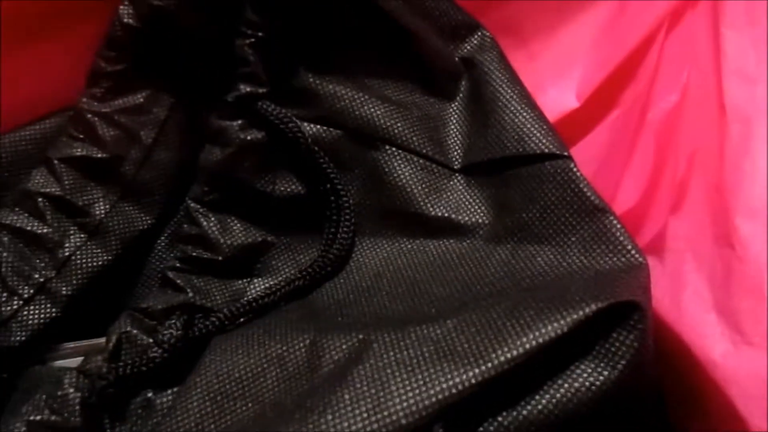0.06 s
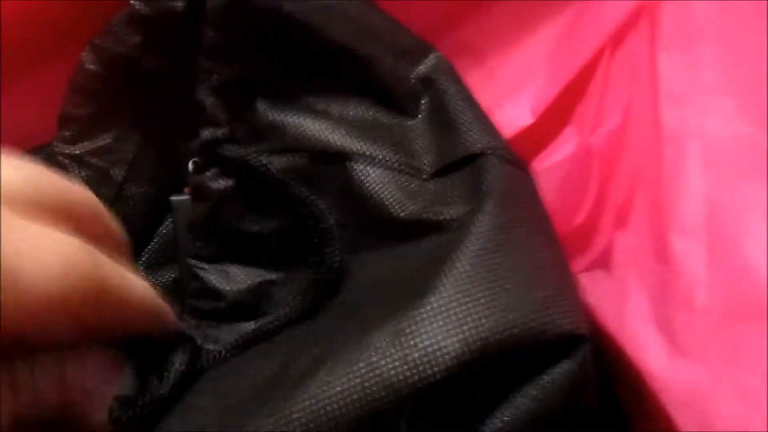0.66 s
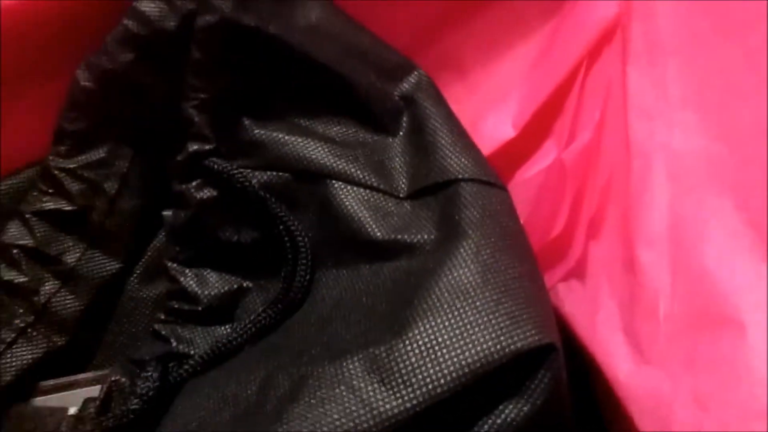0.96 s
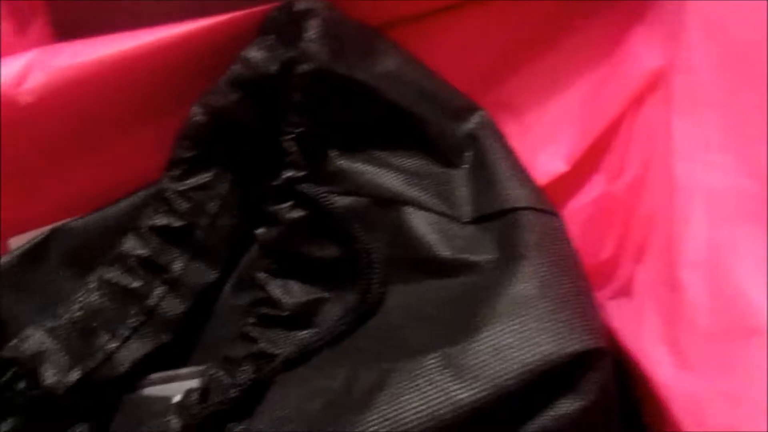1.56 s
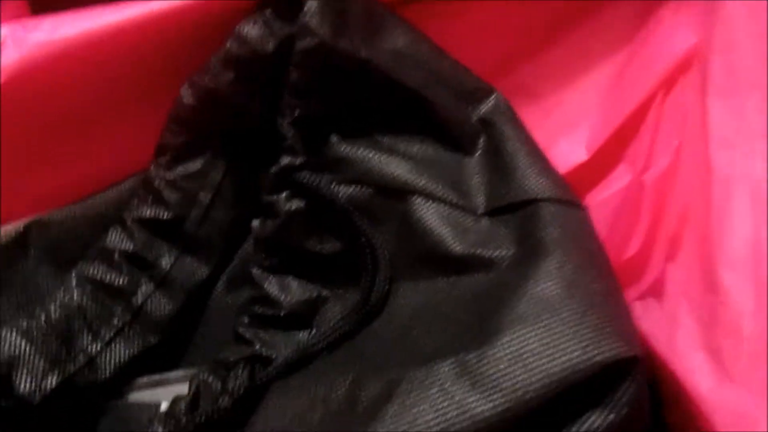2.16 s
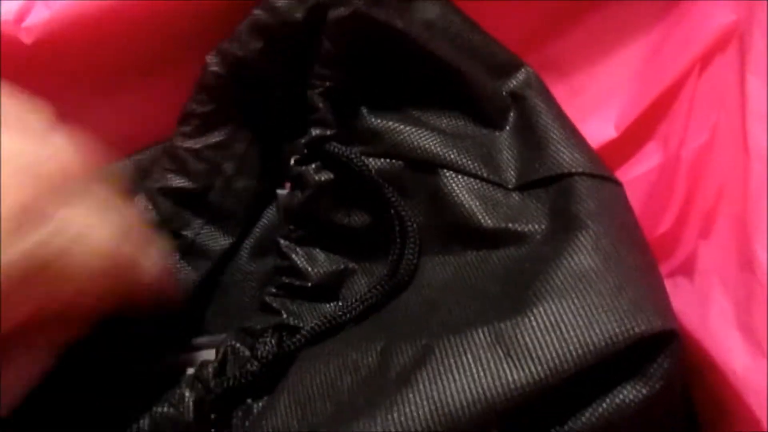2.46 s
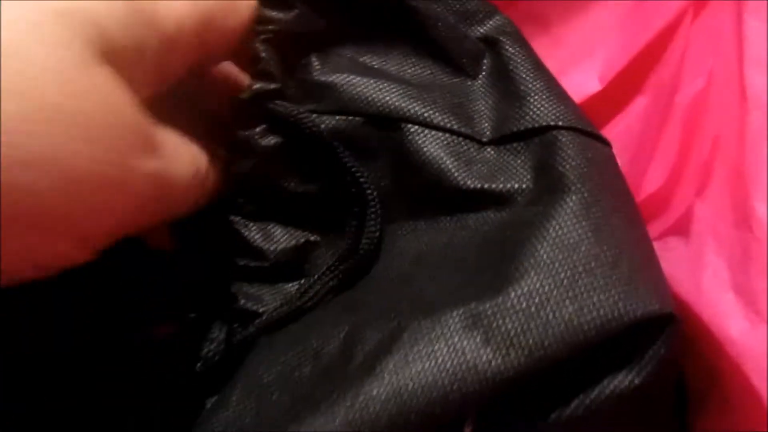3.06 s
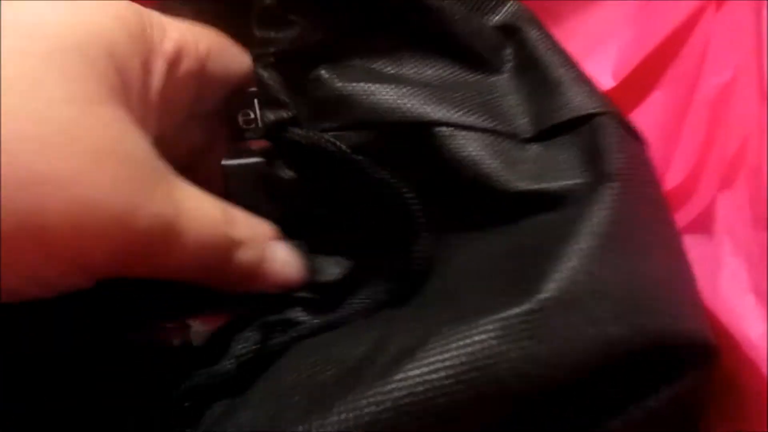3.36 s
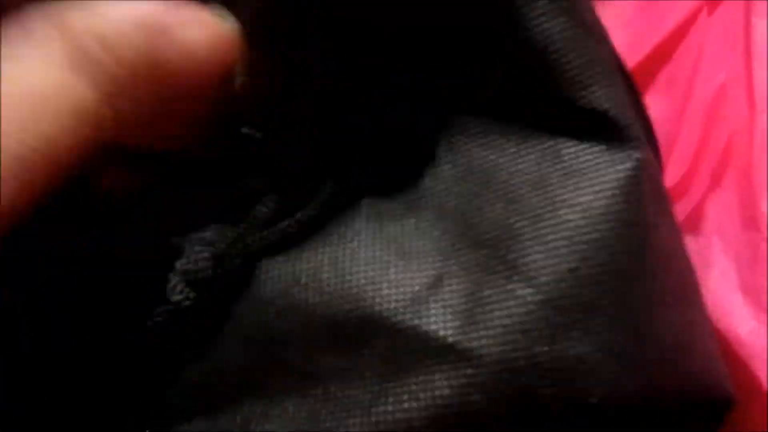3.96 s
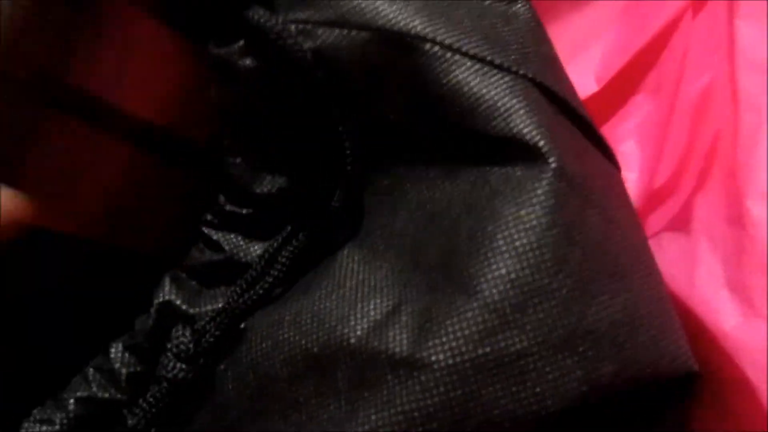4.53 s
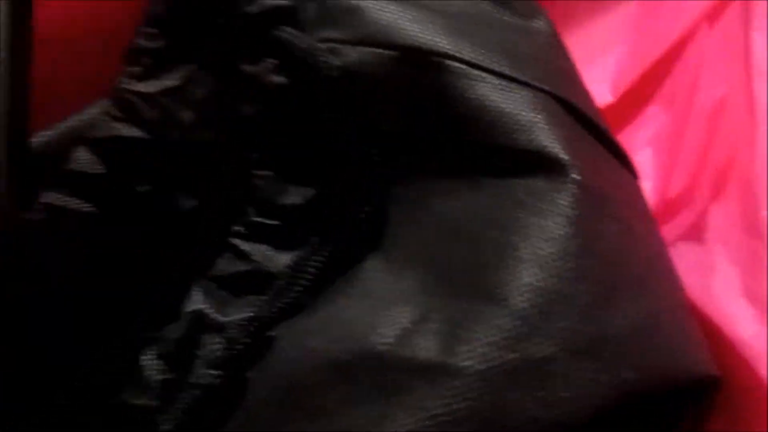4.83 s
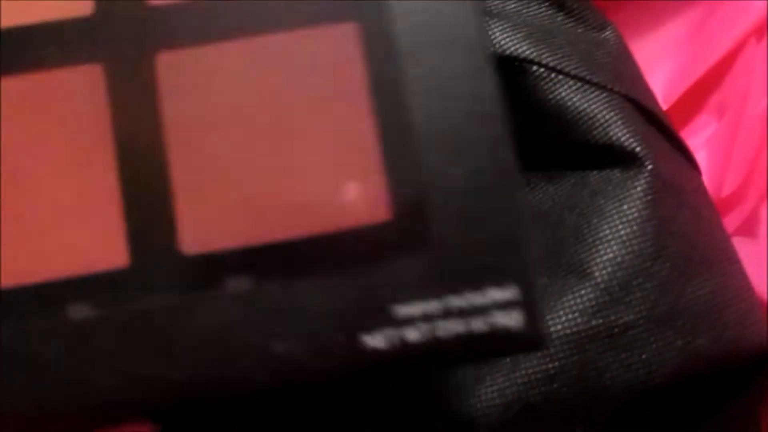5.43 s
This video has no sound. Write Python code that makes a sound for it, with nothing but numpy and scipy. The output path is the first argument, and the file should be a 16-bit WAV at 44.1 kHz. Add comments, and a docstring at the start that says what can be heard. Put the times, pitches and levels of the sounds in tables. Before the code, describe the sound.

A hand rummages in a stiff synthetic drawstring bag, close to the microphone in a small room with little echo. A low fan hum and a faint, fluttering, very high whine run throughout. Soft bumps open the sound, and the cloth scrapes and crackles from about 0.4 to 0.9 seconds. A plastic case knocks lightly twice around 1 second. After a brief lull, a case drops at 1.8 seconds with a thud and a short hollow rattle, the loudest moment. From about 2.3 to 4.7 seconds the rummaging is nearly continuous: hissing, scraping fabric with sharp crease snaps, muffled bumps around 3.5 seconds and a small plastic knock at 3.8. The rustling then fades to a couple of faint crinkles just after 5 seconds. At about 5.6 seconds a plastic lid gives a quick, bright, dry click in the fingers.

```python
"""Rummaging in a drawstring bag

Up close, a hand digs through stiff synthetic fabric: the cloth scrapes and its creases snap.
A plastic case drops with a thud and a rattle; another is pulled out and clicks in the fingers.
Under it all, in a small room, a fan hums and a thin high whine, like a picture tube's, flutters."""
import sys
import numpy as np
from scipy import signal
from scipy.fft import rfft, irfft, next_fast_len
from scipy.io import wavfile
from scipy.ndimage import map_coordinates

SR = 44100
rng = np.random.default_rng(int(sys.argv[2]) if len(sys.argv) > 2 else 0)


def waveform_to_disk(signal):
    """Save audio, clipped to [-1, 1], as 16-bit WAV at the path in sys.argv[1]."""
    frames = np.transpose(np.atleast_2d(signal))
    scaled = np.clip(frames, -1, 1) * 32767
    samples = np.round(scaled).astype(np.int16)
    wavfile.write(sys.argv[1], SR, samples)


N = 246783
T = np.arange(N) / SR

# Tone colour of the fan's draught: f/Hz, level/dB
DRAUGHT_EQ = [(110, -54), (190, 1.5), (314, -4.5), (459, -9.5), (580, -14.5), (719, -19), (877, -11.5),
              (1210, -16.5), (1590, -15), (1770, -15.5), (2280, -15.5), (3700, -21.5), (4840, -23),
              (5490, -21.5), (14000, -24.5)]
# Swells and dips of the whine: t/s, level/dB
WHINE_LEVELS = [(0.03, -75), (0.78, -50), (0.92, -61), (1.2, -48), (1.24, -61), (1.49, -53.5), (2.24, -56),
                (2.3, -50.5), (4.89, -55), (5.09, -64), (5.44, -49), (5.55, -57)]
# Soft bumps through the bedding and the camera body: t/s, peak/dB, f/Hz, t60/s
SOFT_BUMPS = [(0.161, -25, 43, 0.12), (0.296, -30, 48, 0.085), (0.456, -26, 71.6, 0.059),
              (0.462, -31, 650, 0.0076), (0.688, -29.5, 86, 0.057), (0.690, -33.5, 328, 0.041),
              (1.406, -32, 50, .06), (1.7931, -10.5, 190, 0.024), (1.7996, -10, 96.6, 0.14),
              (2.985, -25.5, 150, 0.016), (3.402, -18, 86, 0.08), (3.552, -26, 79, 0.16),
              (3.560, -34.5, 505, 0.058), (3.585, -20.5, 106, 0.071), (4.148, -32, 244, 0.076),
              (4.157, -22.5, 87, 0.14), (4.445, -28, 107, 0.2), (4.592, -35, 580, 0.021),
              (5.036, -32.5, 60, 0.055)]
# Strokes of the hand: t/s, length/s, scrape/dB, hiss over scrape/dB, drag over scrape/dB
HAND_STROKES = [(0.247, 0.63, -55, -9, -1.5), (0.428, 0.43, -46, -1, 1), (0.963, 0.15, -45.5, -5, 1.5),
                (1.059, 0.13, -47, -4, 1.5), (1.1, 0.26, -54, -6, -5), (1.774, 0.15, -41, 0.5, .5),
                (1.897, 0.14, -42, -1, 1.5), (2.34, 0.039, -44.5, 7.5, 3.5), (2.433, 0.14, -43, 2.5, 2.5),
                (2.487, 0.28, -45.5, -0.5, 0), (2.729, 0.2, -48, -1, 2.5), (2.884, 0.34, -46.5, -1.5, 2.5),
                (2.983, 0.027, -46, 8.5, 0), (3.102, 0.2, -44, 1, 1.5), (3.293, 0.23, -45, -1.5, -1.5),
                (3.464, 0.27, -43, -1.5, 3), (3.646, 0.29, -46.5, 1, 2.5), (3.822, 0.049, -36, -9, 2.5),
                (3.86, 0.42, -49.5, -5.5, 2), (4.03, 0.39, -48.5, 6.5, 1.5), (4.125, 0.049, -41, 2, -1),
                (4.262, 0.19, -48.5, 1, 1), (4.386, .17, -44.5, 3, -1.5), (4.538, 0.16, -51, 4.5, -0.5),
                (4.64, 0.29, -63, -5, -1), (4.845, 0.32, -58, -1.5, -2.5)]
# Tone colour of the rubbed cloth: f/Hz, level/dB
CLOTH_EQ = [(88, -39), (150, -2.5), (233, 0), (356, -1.5), (587, -7.5), (829, -18), (1270, -11), (1930, -9),
            (3000, -16.5), (3710, -14), (4860, -18), (5350, -20.5), (6360, -18), (8810, -17.5),
            (14800, -27)]
# The loudest creases snapping over: t/s, peak/dB, treble over mids/dB, patch f/Hz
LOUD_CREASES = [(0.4557, -24, -10, 2200), (0.4725, -33, -2, 1440), (0.6147, -24.5, -7, 2050),
                (0.6612, -31, 6, 1560), (0.7411, -22, 4, 2710), (1.3697, -36.5, 2, 1870),
                (1.9252, -24.5, -2, 2180), (2.3493, -24, -2, 2220), (2.4954, -21, 3, 2030),
                (2.6797, -29.5, 3, 2220), (2.7204, -25, 4, 1360), (2.7688, -26.5, 4, 1800),
                (2.9197, -27, 11, 1830), (2.9472, -28, 5, 1310), (2.993, -21.5, 2, 4150),
                (2.9995, -24, 2, 1430), (3.0337, -21.5, -3, 3630), (3.0707, -23, -4, 1420),
                (3.2074, -20.5, 8, 2380), (3.336, -23, 8, 1330), (3.363, -25, 8, 1420),
                (3.4907, -28.5, 6, 1890), (3.5405, -22, 0, 1860), (3.7377, -23.5, 14, 1180),
                (3.7584, -22.5, 3, 2880), (3.9693, -30.5, 5, 1950), (4.0013, -24.5, -2, 2100),
                (4.1452, -28, 2, 1840), (4.1522, -28, 12, 1870), (4.2952, -28.5, -10, 2000),
                (4.3905, -28, -10, 2100), (4.4801, -26, 7.5, 1750), (4.6501, -25, 16, 2640),
                (4.667, -30.5, 5, 2700), (5.0711, -32, 15, 2580), (5.2263, -37, 5, 1990)]
# Plastic cases knocking together: t/s, peak/dB, treble edge over shell/dB, thump peak/dB
CASE_KNOCKS = [(1.0207, -22, -4.5, -33), (1.0941, -27, -13, -50), (1.8075, -15.5, -20, -23),
               (1.815, -14.5, -9.5, -36), (1.8203, -22, -1, -35), (1.942, -25, 1, -25.5),
               (3.83, -35, 1, -31), (3.8436, -30, -12, -26)]
# Ringing modes of a case: f/Hz, level/dB, t60/s
CASE_MODES = [(1275, 14, 0.032), (1400, -2, 0.039), (1956, -1, 0.27), (2230, 10.5, 0.036),
              (2859, -27, 0.12), (3530, -12, 0.065), (3740, 5, 0.09), (4230, -27, 0.25), (4370, 2, 0.05)]
# Clicks of the lid in the fingers: t/s, peak/dB
LID_CLICKS = [(5.5645, -37), (5.567, -26), (5.569, -12.5), (5.5772, -15)]
# Decay of the room: f/Hz, t60/s
ROOM_DECAY = [(150, 0.55), (1500, 0.42), (10000, 0.2)]


def amp(db):
    """Decibels to gain."""
    return 10 ** (np.asarray(db) / 20)


def unit(x):
    """Scale to rms 1."""
    return x / np.sqrt(np.mean(x ** 2) + 1e-20)


def along(points, hz):
    """Read (f/Hz, value) points on a log frequency axis."""
    freqs, values = np.transpose(points)
    return np.interp(np.log(hz + 1), np.log(freqs + 1), values)


def wobble(per_s):
    """A smooth random curve with per_s knots a second."""
    return map_coordinates(rng.standard_normal(int(N * per_s / SR) + 4), [T * per_s])


def equalise(x, gain_at):
    """Zero-phase EQ by a gain that is a function of frequency."""
    size = next_fast_len(len(x) + 8192)
    return irfft(rfft(x, size) * gain_at(np.fft.rfftfreq(size, 1 / SR)), size)[:len(x)]


def band(x, lo_hz, hi_hz, order=2):
    """Causal band-pass."""
    sos = signal.butter(order, [lo_hz, min(hi_hz, SR / 2 - 100)], "band", fs=SR, output="sos")
    return signal.sosfilt(sos, x)


def place(track, start, sound, peak_db):
    """Mix a sound into the track at start seconds, peaking at peak_db."""
    part = track[round(start * SR):][:len(sound)]
    part += amp(peak_db) * sound[:len(part)] / np.abs(sound).max()


def burst(t, t60):
    """Noise that dies away."""
    return rng.standard_normal(len(t)) * amp(-60 * t / t60)


def fan(hum_hz=120.05, slip_hz=2.063, crest_s=0.32):
    """The motor hums at twice the mains rate and beats with its lagging rotor, over moving air."""
    mains, rotor = np.cos(2 * np.pi * np.outer([hum_hz, hum_hz - slip_hz], T - crest_s))
    hum = amp(-0.3 * wobble(3.7)) * (amp(-38) * mains + amp(-48.5) * rotor)
    air = equalise(rng.standard_normal(N), lambda hz: amp(along(DRAUGHT_EQ, hz)))
    draught = amp(-55) * unit(band(air, 118, 11400, order=3))
    rumble = amp(-53) * unit(band(rng.standard_normal(N), 7.7, 137))
    return hum + draught + rumble


def whine(tones_hz=(15733.5, 15748.1), flutter_db=3):
    """Two close high tones wander in phase and beat, while their level flutters."""
    strong, weak = (np.sin(2 * np.pi * hz * T + wobble(3.88)) for hz in tones_hz)
    level_db = np.interp(T, *np.transpose(WHINE_LEVELS))
    return amp(level_db + flutter_db * wobble(60)) * unit(strong + 0.5 * weak)


def bumps(thump_hz=281.5, thump_t60=0.04):
    """Padded blows, and the hollow thump under each knock: a few damped cycles and a dull puff."""
    track, t = np.zeros(N), np.arange(SR // 3) / SR
    thumps = [(start, db, thump_hz, thump_t60) for start, _, _, db in CASE_KNOCKS]
    for start, db, hz, t60 in list(SOFT_BUMPS) + thumps:
        attack = 1 - np.exp(-t / 0.0007)
        swing = np.sin(2 * np.pi * hz * t) * amp(-60 * t / t60) * attack
        puff = band(burst(t, t60), hz, 3 * hz)
        place(track, start, unit(swing) + 0.2 * unit(puff), db)
    return track


def hand_strokes(skew=0.75, speed_exponent=0.9):
    """Gains of scrape, hiss and drag: the hand speeds up early in each stroke, then slows to rest."""
    power = np.zeros((3, N))  # overlapping strokes add in power
    for start, length, db, hiss_db, drag_db in HAND_STROKES:
        during = slice(*np.searchsorted(T, [start, start + length]))
        progress = (T[during] - start) / length
        speed = np.abs(np.sin(np.pi * progress ** skew))
        gains = amp([db, db + hiss_db, db + drag_db])
        power[:, during] += np.outer(gains, speed ** speed_exponent) ** 2
    return np.sqrt(power)


def fibre_slips(per_s, spread_db):
    """Fibres catch and let go: random impulses of uneven size."""
    size = amp(spread_db * np.minimum(rng.exponential(size=N), 4))
    return unit((rng.random(N) < per_s / SR) * size * rng.choice([-1, 1], N))


def wrinkles(per_s, pitch_hz, cycles, spread_db):
    """Small wrinkles pop in clusters, each ringing out briefly at a pitch of its own."""
    t = np.arange(SR // 100) / SR
    starts = np.flatnonzero(rng.random(N) < per_s / SR * amp(4 * wobble(25)))
    detune, size = rng.standard_normal((len(starts), 2)).T[:, :, None]
    hz = np.clip(pitch_hz * np.exp(0.4 * detune), 600, 13000)
    pops = amp(spread_db * np.minimum(size, 2) - 60 * t * hz / cycles) * np.sin(2 * np.pi * hz * t)
    positions = starts[:, None] + np.arange(len(t))
    return unit(np.bincount(positions.ravel(), pops.ravel(), N)[:N])


def rustle(scrape_gain, hiss_gain, drag_gain):
    """Cloth slides on cloth: a crinkly scrape and a hiss of weave, over the bag's hollow drag."""
    friction = unit(rng.standard_normal(N) + 0.81 * fibre_slips(per_s=1000, spread_db=4))
    friction *= amp(2.08 * wobble(70))  # the fingers stick and slide
    cloth = equalise(friction, lambda hz: amp(along(CLOTH_EQ, hz)))
    crinkle = wrinkles(per_s=300, pitch_hz=2100, cycles=16.5, spread_db=7)
    fine_crinkle = wrinkles(per_s=260, pitch_hz=7640, cycles=7.8, spread_db=0.5)
    swish = amp(0.71 * wobble(28))  # the weave catches in short swishes
    scrape = scrape_gain * unit(unit(band(cloth, 710, 4750, order=3)) + 0.5 * crinkle)
    weave = unit(band(cloth, 5210, 19600, order=5))
    hiss = hiss_gain * unit(swish * (weave + 0.62 * fine_crinkle))
    drag = drag_gain * unit(band(cloth, 142, 814, order=3))
    heave = amp(-2) * drag_gain * unit(band(rng.standard_normal(N), 56, 143))  # the whole bag shifts
    return scrape + hiss + drag + heave


def creases(folds):
    """A fold buckles with a sharp snap and a short crackle; its patch of cloth rings briefly."""
    track, t = np.zeros(N), np.arange(SR // 20) / SR
    for start, db, treble_db, patch_hz in folds:
        crack = burst(t, t60=0.0059) + 0.046 * burst(t, t60=0.022) + 2 * (t == 0)
        patch = np.sin(2 * np.pi * patch_hz * t) * amp(-60 * t / 0.011)
        mids = unit(band(crack, 1340, 4940, order=3)) + unit(patch)
        treble = amp(treble_db) * unit(band(crack, 5100, 12700))
        place(track, start, mids + treble, db)
    return track


def small_creases(scrape_gain, per_s=9.8, over_scrape_db=12, treble_db=5, patch_hz=2000):
    """Lesser folds give way at random, as hard as the hand is rubbing."""
    folds = []
    for i in np.flatnonzero(rng.random(N) < per_s / SR):
        size, brightness, detune = rng.standard_normal(3)
        peak_db = 20 * np.log10(scrape_gain[i] + 1e-9) + over_scrape_db + 2 * size
        folds.append((T[i], peak_db, treble_db + 5 * brightness, patch_hz * np.exp(0.28 * detune)))
    return creases(folds)


def case_knocks():
    """Every contact cracks and rings the hollow plastic case, with a new balance of its modes."""
    track, t = np.zeros(N), np.arange(SR // 4) / SR
    for start, db, edge_db, _ in CASE_KNOCKS:
        ring = np.zeros(len(t))
        for hz, mode_db, t60 in CASE_MODES:
            envelope = amp(mode_db + 2.5 * rng.standard_normal() - 60 * t / t60)
            gripped_hz = hz * (1 + 0.016 * rng.standard_normal())  # the grip detunes the case
            ring += envelope * np.sin(2 * np.pi * (gripped_hz * t + rng.random()))
        crack = burst(t, t60=0.012) + 0.063 * burst(t, t60=0.13)  # the blow, then loose contents
        shell = unit(band(crack, 1195, 1610)) + 0.57 * unit(band(crack, 2040, 5140))
        edge = amp(edge_db) * unit(band(crack, 5000, 7700))
        place(track, start, shell + edge + 0.59 * unit(ring), db)
    return track


def lid_clicks():
    """The hard edge of the lid gives a bright, dry tick."""
    track, t = np.zeros(N), np.arange(SR // 20) / SR
    for start, db in LID_CLICKS:
        crack = burst(t, t60=0.0093) + 0.043 * burst(t, t60=0.065)
        tick = unit(band(crack, 5100, 7860)) + 0.5 * unit(band(crack, 240, 4200))
        place(track, start, tick, db)
    return track


def room(send):
    """Reverb of a small furnished room: the highs die first."""
    hz, t, spectrum = signal.stft(rng.standard_normal(SR // 2), SR, nperseg=256)
    decay = amp(-60 * t / along(ROOM_DECAY, hz)[:, None])
    tail = signal.istft(spectrum * decay, SR, nperseg=256)[1]
    predelayed = np.pad(send, (SR // 200, 0))
    return signal.fftconvolve(predelayed, tail / np.linalg.norm(tail))[:N]


def scene():
    """Close handling with a touch of reverb, over a bed of fan and whine."""
    scrape_gain, hiss_gain, drag_gain = hand_strokes()
    bag = rustle(scrape_gain, hiss_gain, drag_gain) + creases(LOUD_CREASES) + small_creases(scrape_gain)
    plastic = case_knocks() + lid_clicks()
    thuds = bumps()
    reverb = room(amp(-13.5) * bag + amp(-14.5) * plastic + amp(-29) * thuds)
    return (bag + plastic + thuds + reverb + fan() + whine())[None]


def record(dry):
    """The microphone loses the deepest bass and the very top; its port notches the treble."""
    low_cut_hz, top_hz = 17.6, 15850
    notch_hz, half_width_hz, depth_db = 4800, 254, 16

    def response(hz):
        notch = amp(-depth_db / (1 + ((hz - notch_hz) / half_width_hz) ** 2))
        return notch * (hz < top_hz)

    thinned = band(dry[0], low_cut_hz, SR / 2, order=1)
    return equalise(thinned, response)[None]


dry = scene()
out = record(dry)
waveform_to_disk(out)
```